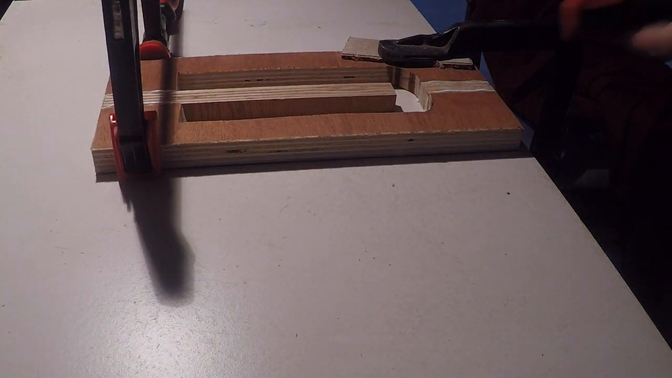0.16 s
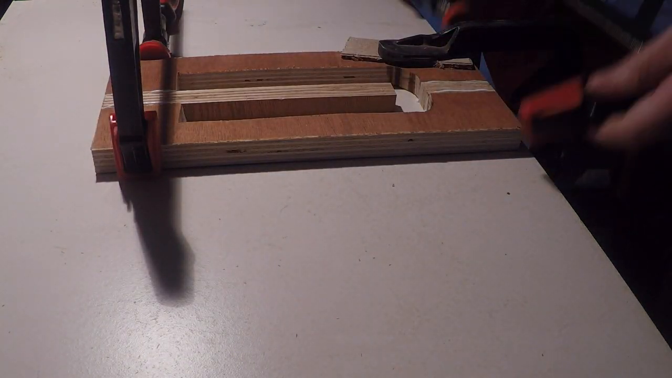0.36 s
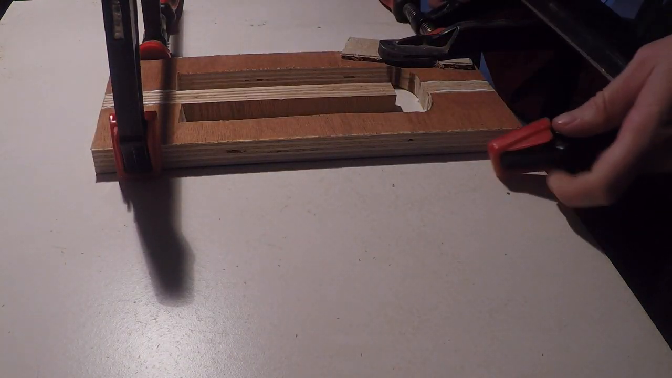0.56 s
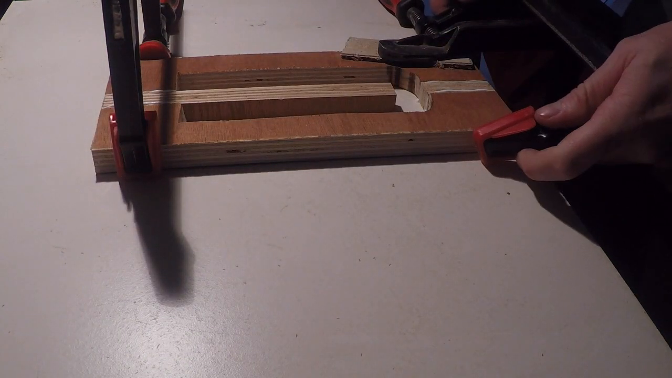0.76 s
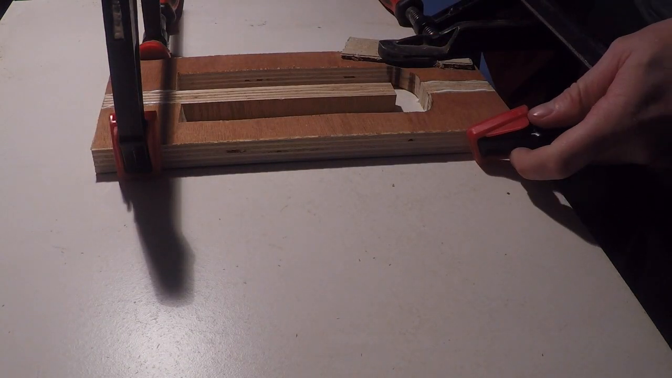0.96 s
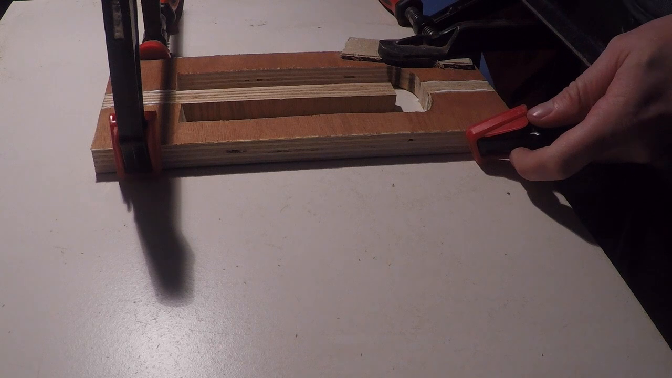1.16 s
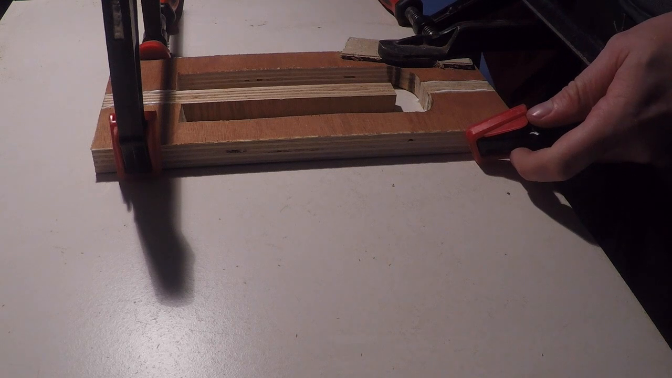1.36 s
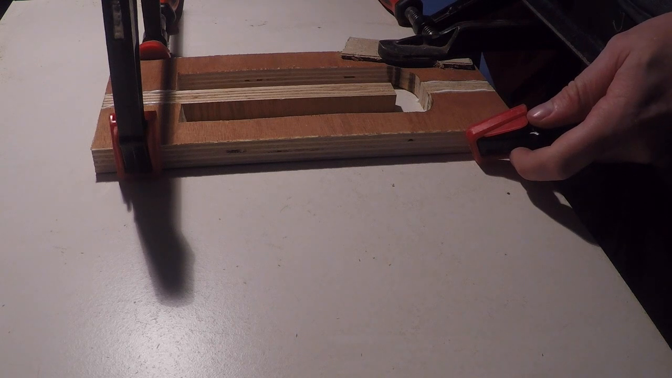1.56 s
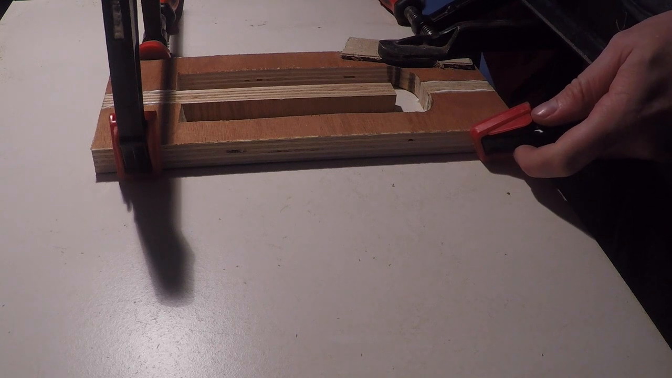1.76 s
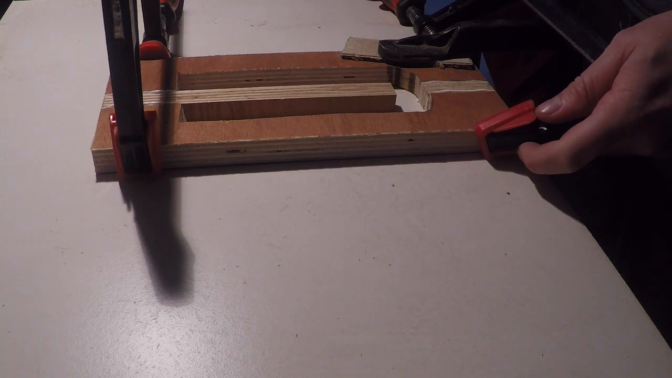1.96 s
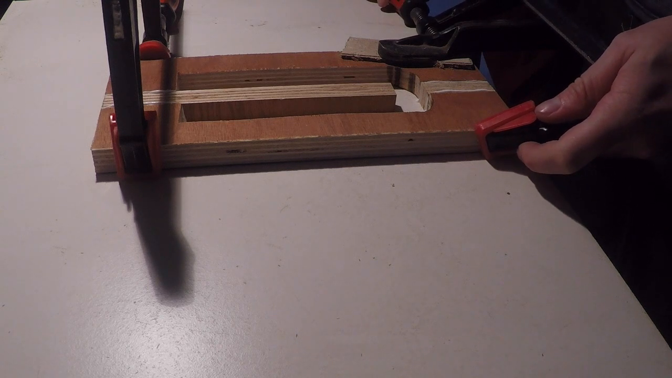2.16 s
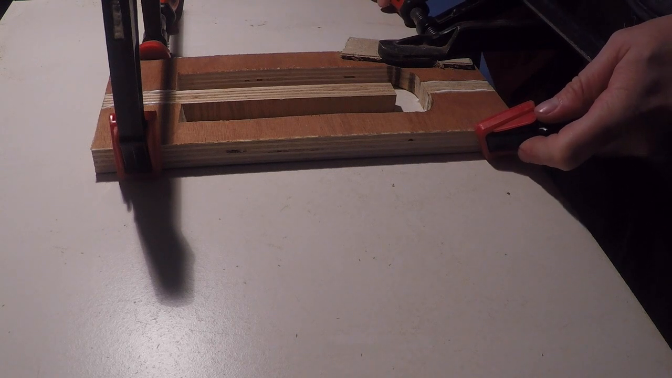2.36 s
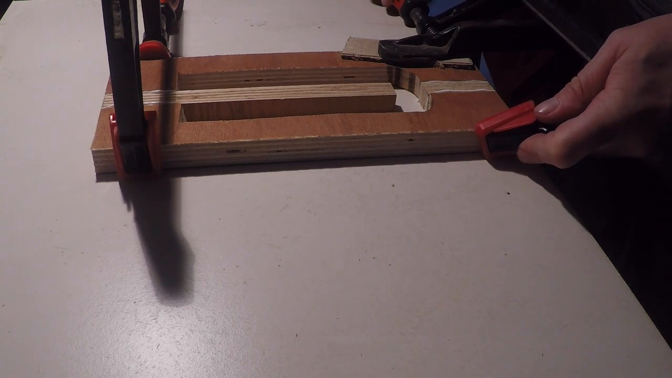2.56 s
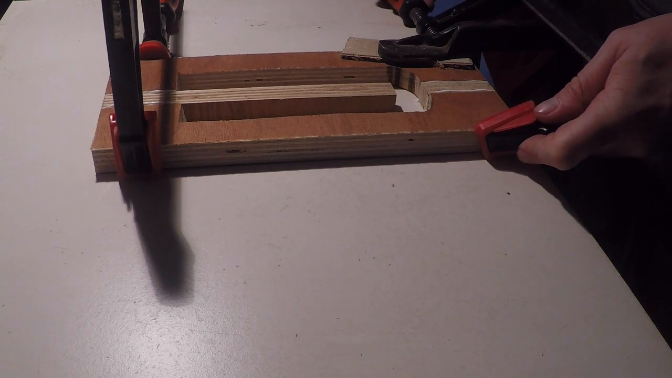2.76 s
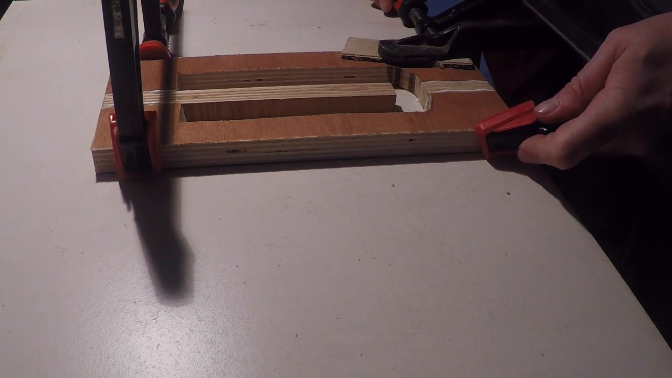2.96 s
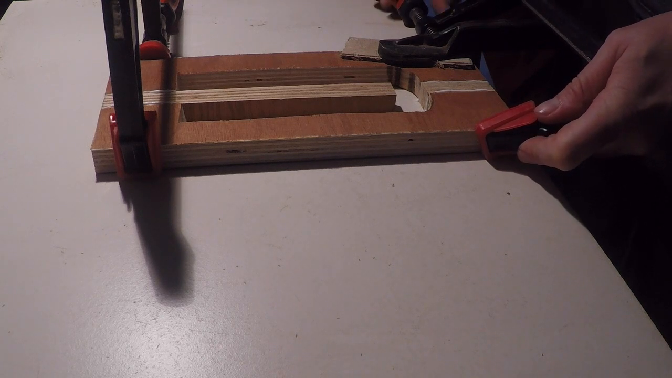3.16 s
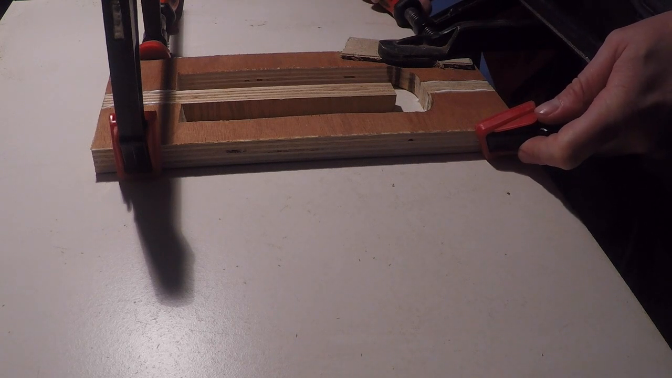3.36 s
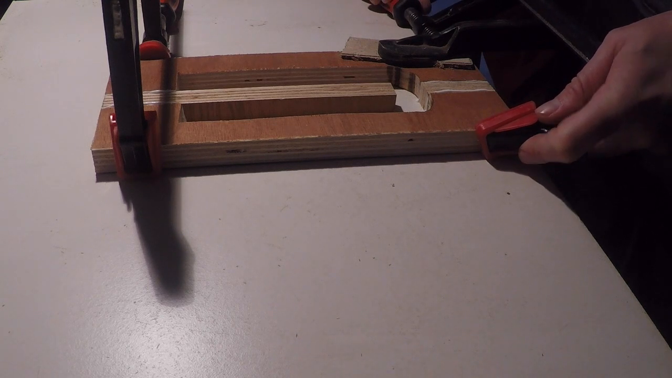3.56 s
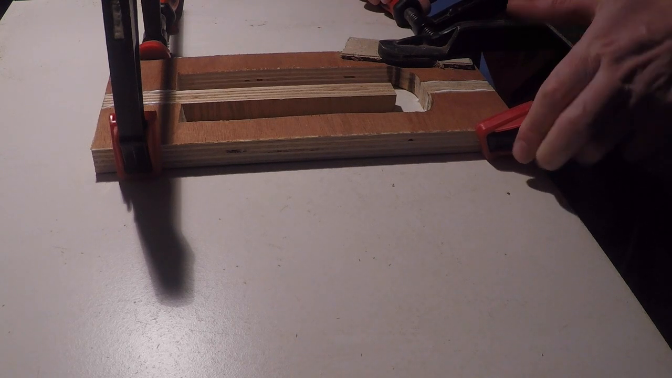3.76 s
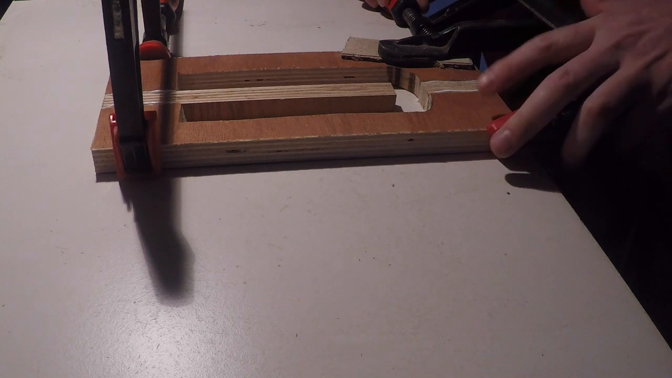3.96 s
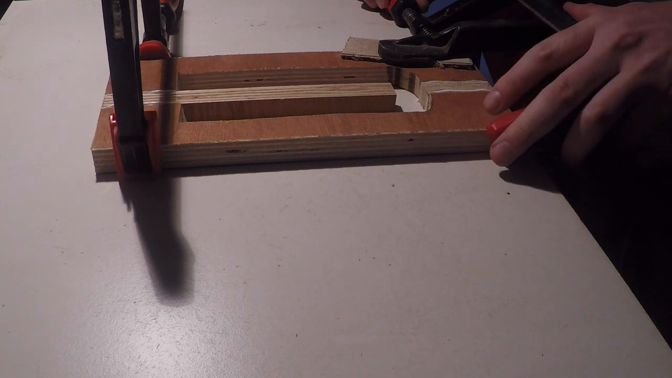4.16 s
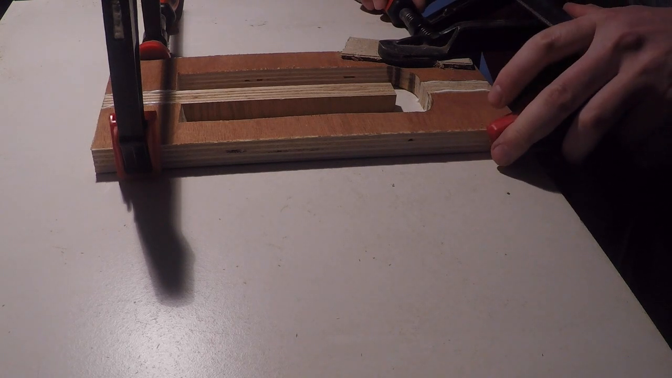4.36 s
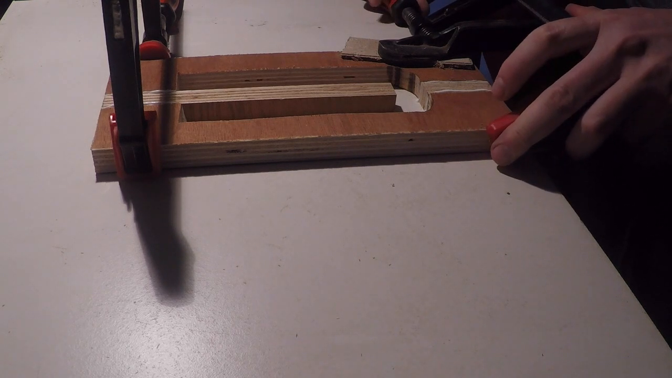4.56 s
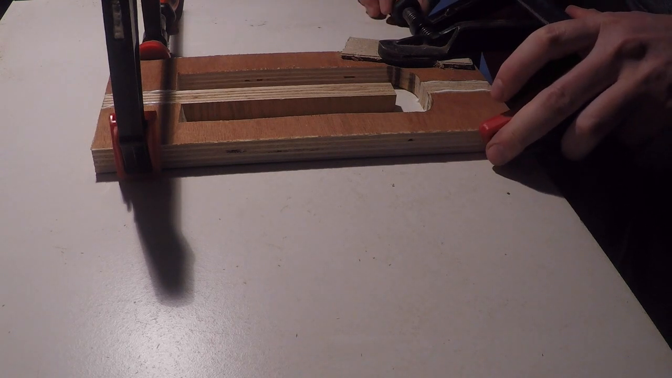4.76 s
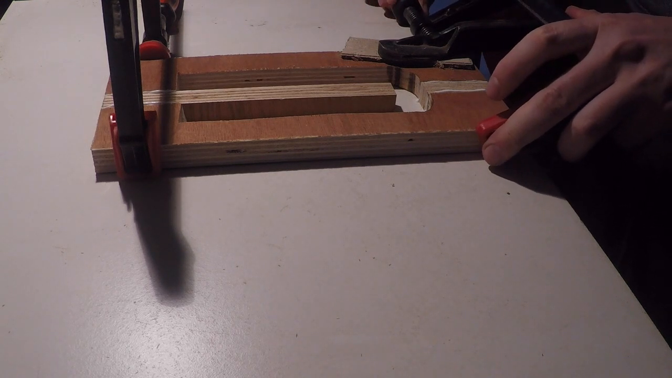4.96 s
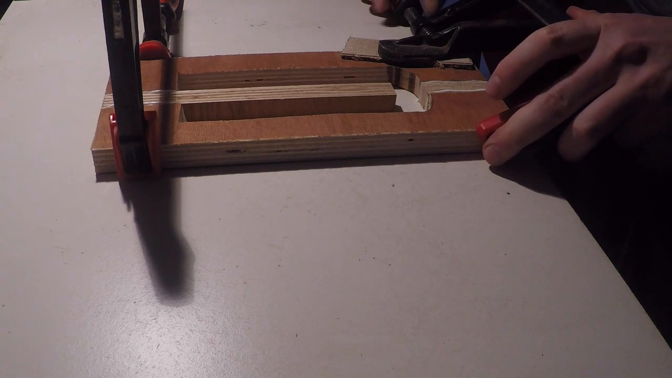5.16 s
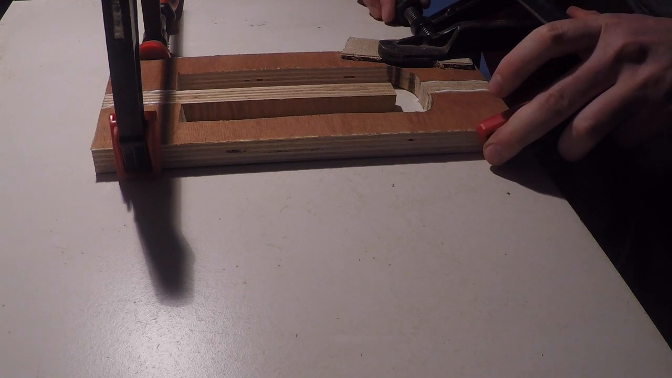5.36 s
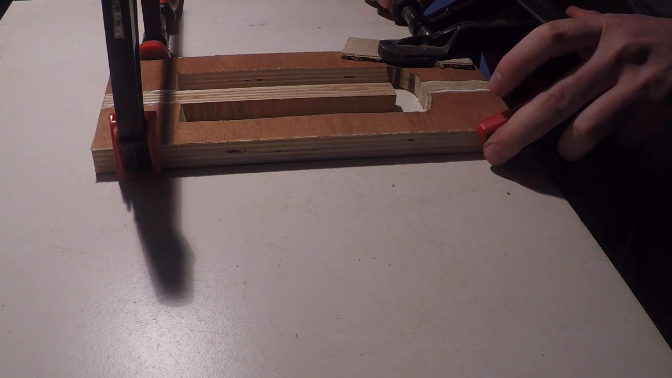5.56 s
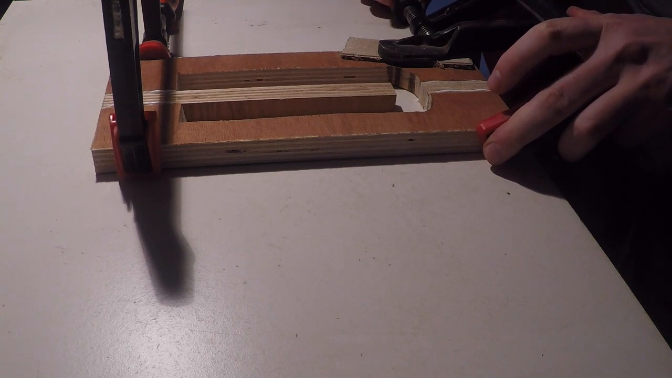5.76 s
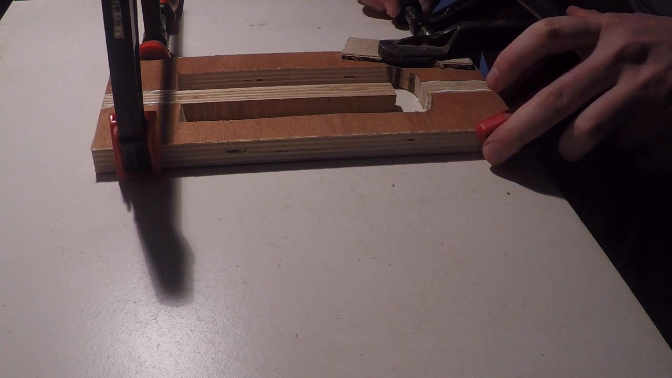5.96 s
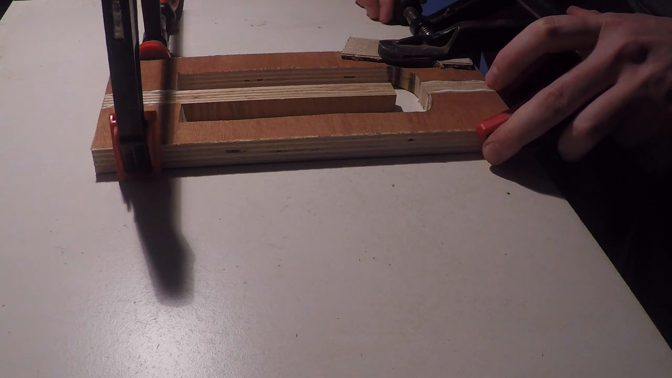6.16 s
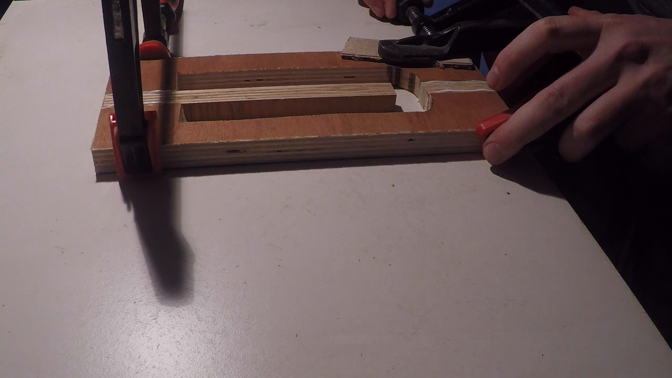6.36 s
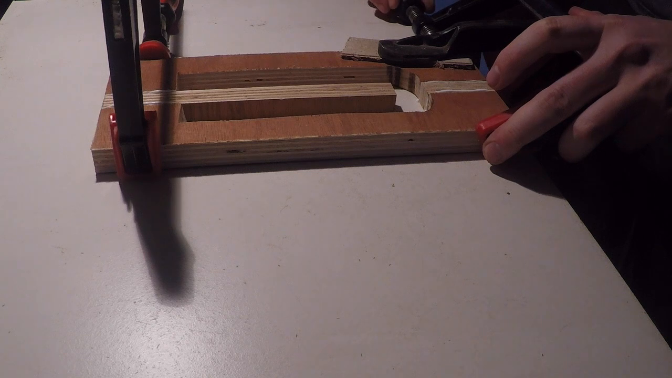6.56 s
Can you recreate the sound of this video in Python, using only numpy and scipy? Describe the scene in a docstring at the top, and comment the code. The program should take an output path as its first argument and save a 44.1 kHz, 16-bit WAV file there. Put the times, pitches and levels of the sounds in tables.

```python
"""A steel bar clamp is slid open, set on a plywood workpiece and tightened on a bench in a small workshop.
Its jaw scrapes and catches along the bar: tiny random slips make the steel ring, and at times squeak.
Blows on the wood mix a bench thud, a jaw crack and a ring of steel; the work also judders, shifts and creeps.
Once there is a light rub along the clamp. Hiss and a faint machine rumble in the building, both made of
filtered noise, run throughout with a low hum and a faint sounding of the bench."""
import sys
import numpy as np
from scipy import signal
from scipy.fft import rfft, irfft
from scipy.io import wavfile
from scipy.ndimage import uniform_filter1d

SR = 44100
rng = np.random.default_rng(int(sys.argv[2]) if len(sys.argv) > 2 else 0)


def pcm_store(signal):
    """Save signal as 16-bit PCM."""
    levels = np.round(np.clip(np.atleast_2d(signal), -1, 1) * 32767)
    wavfile.write(sys.argv[1], SR, levels.astype(np.int16).T)


N = 291060
TIME = np.arange(N) / SR  # seconds since the scene began
AGE = np.arange(24576) / SR  # seconds since one sound began


def amp(db):
    """Turns decibels into a gain."""
    return 10 ** (np.asarray(db) / 20)


def unit(x):
    """Scales a sound to an average strength (rms) of 1."""
    return x / np.sqrt(np.mean(x ** 2) + 1e-20)


def struck(x, size=882):
    """Scales a sound so that its first `size` samples (normally 20 ms) have rms 1."""
    return x / np.sqrt(np.mean(x[:size] ** 2) + 1e-20)


def add(mix, s, sound):
    """Mixes a sound in at time s."""
    start = max(round(s * SR), 0)
    part = mix[start:][:len(sound)]
    part += sound[:len(part)]


def colour(x, points):
    """Filters a sound by a curve of (frequency, level) points."""
    hz, db = np.transpose(points)
    bins_hz = np.fft.rfftfreq(len(x), 1 / SR)
    curve_db = np.interp(np.log(bins_hz + 1), np.log(hz), db)
    return irfft(rfft(x) * amp(curve_db), len(x))


def noise(points, size):
    """Makes coloured noise of rms 1."""
    return unit(colour(rng.standard_normal(size), points))


def fade(t60):
    """Dies away by 60 dB in t60 seconds."""
    return np.exp(-np.log(1000) * AGE / max(t60, 1e-3))


def rise(seconds):
    """Gives a soft start, quick at first and then levelling off."""
    return 1 - np.exp(-AGE / max(seconds, 1e-5))


def arch(seconds):
    """Swells and sinks again within the given time."""
    return np.sin(np.pi * np.minimum(AGE / seconds, 1))


def slips(per_s, size):
    """Makes tiny stick-slip impulses at random moments."""
    happens = rng.random(size) < per_s / SR
    return rng.standard_normal(size) * happens


def bending_wave(points, delay_s, ref_hz=500):
    """A pulse crosses the bench top: high notes travel faster, so it arrives as a falling chirp."""
    hz = np.fft.rfftfreq(len(AGE), 1 / SR)
    # delay_s is the travel time at ref_hz
    chirp = irfft(np.exp(-2j * 2 * np.pi * delay_s * np.sqrt(hz * ref_hz)), len(AGE))
    return colour(chirp, points) * fade(t60=0.16)


# ringing notes of bench top and workpiece: (frequency [Hz], relative level [dB], 60 dB fade time [s])
WOOD_MODES = [(106.6, -10, 0.21), (173.3, 0, 0.17), (200, -5.5, 0.13), (245.3, -5, 0.18), (325, 0, 0.14),
              (346, -9, 0.34), (383.5, 1.5, 0.16), (425.3, -5, 0.26), (493, -12, 0.1), (548, -6.5, 0.11),
              (580.6, -4.5, 0.11), (677, -13.5, 0.19), (729, -10, 0.15), (813, -45, 0.042),
              (920, -27.5, 0.27), (1002, -19, 0.12), (1128, -20.5, 0.16)]
# many short notes of the wood, too close to tell apart: (frequency [Hz], relative level [dB])
WOOD_GRAIN = [(60, -29), (150, 4.5), (230, -0.5), (400, 12.5), (650, -5), (900, -10.5), (1300, -14),
              (2200, -60)]
# the bending wave straight from the blow: (frequency [Hz], relative level [dB])
FIRST_WAVE = [(50, 9), (150, -0.5), (330, 1.5), (600, 1), (900, -5), (1400, -20), (2200, -23.5),
              (5000, -87)]


def wood(hardness_db, hinge_hz=380, neutral_db=-11, grain_db=-6, wave_db=-1.5, echo_db=-4):
    """The bench rings; a hard contact brings out its high notes, a soft one leaves only the low ones."""
    def tilt_db(hz):
        octaves = np.log2(max(hz / hinge_hz, .8))
        return (hardness_db - neutral_db) * octaves

    modes = np.zeros(len(AGE))
    for k, (hz, db, t60) in enumerate(WOOD_MODES):
        # neighbouring notes start in opposite directions, so the thud takes a few ms to build
        modes += (-1) ** k * amp(db + tilt_db(hz)) * fade(t60) * np.sin(2 * np.pi * hz * AGE)

    grain_shape = [(hz, db + tilt_db(hz)) for hz, db in WOOD_GRAIN]
    grain_fade = fade(t60=0.15) + amp(-15.5) * fade(t60=0.28)
    grain = noise(grain_shape, len(AGE)) * rise(0.0016) * grain_fade

    # the wave arrives once directly and once, duller, from the far edge
    direct_shape = [(hz, db + tilt_db(hz)) for hz, db in FIRST_WAVE]
    edge_shape = [(hz, db - 6 * max(np.log2(hz / hinge_hz), 0)) for hz, db in direct_shape]
    direct = bending_wave(direct_shape, delay_s=0.002212)
    edge = bending_wave(edge_shape, delay_s=0.008005)
    wave = direct + amp(echo_db) * edge
    return struck(struck(modes) + amp(grain_db) * struck(grain) + amp(wave_db) * struck(wave))


# the steady hiss: (frequency [Hz], relative level [dB])
AIR = [(53, -16), (90, 2), (102, 2), (190, -0.5), (216, -10), (241, -8), (280, -10), (370, -15.5),
       (411, -12.5), (448, -18.5), (579, -21), (1060, -14.5), (1150, -18), (4240, -20.5), (15000, -35)]
# the machine's rumble: (frequency [Hz], relative level [dB])
RUMBLE = [(8, -23), (20, -46), (33, -5), (46, 4), (56, -6.5), (75, -16), (100, -21.5), (170, -61.5)]
# a steady low hum: (frequency [Hz], level [dB])
HUM = [(26.9, -42.5)]


def workshop(air_db=-61, rumble_db=-43, bench_db=-65):
    """Hiss and rumble are filtered noise, the hum a pure tone; gentle noise keeps the bench sounding."""
    hum = np.zeros(N)
    for hz, db in HUM:
        # the root of 2 gives the tone its level as rms
        hum += amp(db) * np.sqrt(2) * np.sin(2 * np.pi * (hz * TIME + rng.random()))
    bench = unit(signal.fftconvolve(rng.standard_normal(N), wood(hardness_db=-13.5))[:N])
    return amp(air_db) * noise(AIR, N) + amp(rumble_db) * noise(RUMBLE, N) + hum + amp(bench_db) * bench


# the work shifts on the bench under the hand:
# (time [s], level before the overall trim [dB], hardness [dB], length [s])
NUDGES = [(0.0, -46.5, -11, 0.044), (0.051, -47.5, -8.5, 0.077), (0.581, -31.5, -19.5, 0.015),
          (0.658, -35, -18.5, 0.021), (0.704, -29, -21, 0.034), (1.991, -43.5, -20, 0.032),
          (2.064, -48, -4.5, 0.026), (2.838, -52, -8, 0.15), (3.088, -46, -11.5, 0.033),
          (3.291, -55.5, -10.5, 0.133), (3.893, -46, -10.5, 0.066), (4.103, -49.5, -6.5, 0.016),
          (4.252, -53.5, -12.5, 0.021), (4.807, -47, -14.5, 0.04), (4.916, -47, -16.5, 0.087),
          (5.49, -46.5, -12.5, 0.072), (6.22, -47.5, -20, 0.022), (6.488, -48.5, -15, 0.037)]


def nudges(trim_db=-1, slips_per_s=1200):
    """Each nudge is a swell of tiny slips, each slip thumping the bench."""
    out = np.zeros(N)
    for s, db, hardness, length in NUDGES:
        swell = slips(slips_per_s, len(AGE)) * arch(length)
        thump = signal.fftconvolve(swell, wood(hardness))[:len(AGE)]
        add(out, s, amp(db + trim_db) * struck(thump, size=round((length + .012) * SR)))
    return out


# ringing notes of the clamp's bar:
# (frequency [Hz], relative level before random variation [dB], 60 dB fade time [s])
BAR = [(719.2, -3.5, 0.55), (1771, -6.5, 0.14), (2400, -16, 0.3), (2717, 5.5, 0.11), (3570, -4, 0.23),
       (3800, -17, 0.5), (4100, 0, 0.24), (4484, -2.5, 0.32), (4550, 3, 0.22), (4610, -5, 0.75),
       (4830, -9.5, 0.22), (5440, -6, .35), (6770, -11, 0.19), (8550, -11.5, .15)]


def bar_modes():
    """The bar rings at its own notes; every call, like a new point of contact, mixes them differently."""
    out = np.zeros(len(AGE))
    for hz, db, t60 in BAR:
        strength = amp(db) * (.5 + rng.random())
        out += strength * fade(t60) * np.sin(2 * np.pi * (hz * AGE + rng.random()))
    return out


# the bar's dense ring, before any brightening: (frequency [Hz], relative level [dB])
STEEL = [(500, -6.5), (1000, -15.5), (1900, -9), (2800, -5.5), (3400, -4.5), (4600, -2.5), (5400, -6),
         (6200, -11.5), (7200, -15.5), (8600, -20), (10500, -36), (15000, -34)]


def steel(tail_db, lines_db, bright_db=0):
    """Short noise makes a bright tick, longer noise the clamp's dense ring, and the bar adds its own notes."""
    # brightness acts little by little from 4800 Hz, in full from 8000 Hz
    shape = [(hz, db + bright_db * np.interp(hz, [4800, 8000], [0, 1])) for hz, db in STEEL]
    tick_and_tail = fade(t60=0.036) + amp(tail_db) * fade(t60=0.65)
    dense = noise(shape, len(AGE)) * rise(0.00015) * tick_and_tail
    return struck(struck(dense) + amp(lines_db) * struck(bar_modes()))


# the jaw slides along the bar: (time [s], drive level of the scrape [dB])
SLIDE = [(0.05, -60), (0.126, -53.5), (0.134, -48), (0.174, -57), (0.18, -50.5), (0.32, -45),
         (0.328, -40.5), (0.42, -58)]
# the jaw snags on its bar: (time [s], level before the overall trim and soft start [dB], brightness [dB])
CATCHES = [(0.13, -38.5, -8), (0.2199, -36, 4), (0.2658, -35, -7), (0.3267, -32, 6.5), (0.36, -34, -5),
           (0.528, -32.5, -2), (0.6876, -40, 5), (3.87, -51, 11)]


def jaw(catch_trim_db=-8.5, scrape_db=-1.5, sing_db=-4, grains_per_s=220, contacts=4):
    """Slips at several points of contact grate along the bar and make it sing; now and then the jaw snags."""
    s, db = np.transpose(SLIDE)
    pressure = np.interp(TIME, s, amp(db), 0, 0)  # silent before and after the slide
    out = np.zeros(N)
    for _ in range(contacts):
        tick = steel(tail_db=-21, lines_db=-17)
        modes = bar_modes()
        # both parts are scaled to equal energy before they are mixed
        ring = amp(scrape_db) * tick / np.linalg.norm(tick) + amp(sing_db) * modes / np.linalg.norm(modes)
        grating = unit(slips(grains_per_s / contacts, N)) * pressure
        out += signal.oaconvolve(grating, ring)[:N] / np.sqrt(contacts)
    for s, db, bright in CATCHES:
        snag = rise(0.0017) * steel(tail_db=-20, lines_db=-5.5, bright_db=bright)
        add(out, s, amp(db + catch_trim_db) * snag)
    return out


# the steel squeaks under load: (time [s], pitch [Hz], level without the room [dB])
SQUEAKS = [(0.119, 5430, -58), (0.338, 4450, -46.5), (2.032, 4690, -59.5), (2.858, 2800, -69),
           (2.9, 4950, -67), (3.885, 4480, -67.5)]
SQUEAK_S, SQUEAK_WIDTH_HZ = 0.053, 300  # length of the drive; width of each of the two resonance stages


def squeaks(room_db=-9):
    """Brief stick-slip, made as noise, feeds one narrow resonance, which lingers in the room."""
    out = np.zeros(N)
    for s, hz, db in SQUEAKS:
        drive = rng.standard_normal(len(AGE)) * arch(SQUEAK_S)
        pole = np.exp((2j * hz - SQUEAK_WIDTH_HZ) * np.pi / SR)
        # using the pole twice makes two equal resonances in a row
        resonance = signal.lfilter([1], np.poly([pole, pole]), drive).real
        tone = struck(resonance, size=round(SQUEAK_S * SR))
        room = rng.standard_normal(len(AGE)) * fade(t60=.5)
        echo = signal.fftconvolve(tone, room / np.linalg.norm(room))[:len(AGE)]
        add(out, s, amp(db) * (tone + amp(room_db) * echo))
    return out


# the crack of jaw against wood: (frequency [Hz], relative level [dB])
CLACK = [(400, -32), (650, 10.5), (1000, 6.5), (1300, -12), (1500, 3), (2050, 5.5), (2400, -2.5),
         (2750, 4.5), (3400, -15.5), (4500, -5), (6500, -45), (12000, -65)]
# what the room keeps of that crack: (frequency [Hz], relative level [dB])
WASH = [(400, -9), (1200, -10), (1700, -8), (2050, 2), (2400, 0), (2850, 1.5), (3350, -3.5), (4000, -5),
        (4750, -9), (6000, -28), (12000, -46)]


def clack(wash_db):
    """The jaw cracks briefly against the wood, then the room holds a wash of it; both are fading noise."""
    crack = noise(CLACK, len(AGE)) * rise(0.00038) * fade(t60=0.061)
    wash = noise(WASH, len(AGE)) * rise(0.0013) * fade(t60=0.42)
    return struck(crack) + amp(wash_db) * struck(wash)


# blows of the clamp on the work: (time [s], thud level [dB], hardness [dB], clack level [dB],
# room wash relative to the clack [dB], steel ring level [dB], steel brightness [dB])
KNOCKS = [(0.429, -23, -8, -36.5, -10, -36.5, 1), (0.535, -20, -12, -38.5, -21, -41.5, -12),
          (0.543, -19.5, -14.5, -38.5, -26, -44, -5), (0.574, -26, -13, -50.5, -20, -66, -8),
          (0.7418, -31, -7.5, -37.5, -1.5, -41, 2), (0.758, -28.5, -13, -55, -26, -52, 5),
          (2.042, -42.5, -12, -60, -17, -55, -3), (2.066, -40, -25, -54.5, -11, -63, -9),
          (2.915, -35, -13, -70, 2, -59.5, -5), (3.752, -41.5, -28, -62.5, -22, -64.5, 2),
          (3.966, -38.5, -15.5, -78, -17, -72, 0), (5.1746, -32.5, -7.5, -48.5, -14, -61, 5),
          (5.53, -26, -8, -29.5, -12, -41.5, -16), (5.5333, -31.5, -11, -36, -11, -49, -11),
          (5.565, -33.5, -16.5, -62, -7, -49.5, -1)]


def knocks():
    """Each blow sounds the bench, the jaw and the bar together."""
    out = np.zeros(N)
    for s, thud_db, hardness, crack_db, wash_db, ring_db, bright in KNOCKS:
        add(out, s, amp(thud_db) * wood(hardness))
        add(out, s, amp(crack_db) * clack(wash_db))
        add(out, s, amp(ring_db) * steel(tail_db=-14.0, lines_db=-14.5, bright_db=bright))
    return out


# the workpiece judders on the bench when it is pressed home:
# (time [s], pitch [Hz], level of the bounces [dB])
JUDDERS = [(0.538, 328, -10.5), (0.702, 226.5, -28.5), (0.753, 380, -20.5), (2.923, 265, -33.5),
           (3.97, 339, -37), (5.547, 398, -25.5)]


def judders(under_db=-9, bench_db=-18, length_s=0.021):
    """A few quick bounces, alternately strong and weak, set the bench ringing."""
    out = np.zeros(N)
    for s, hz, db in JUDDERS:
        turns = hz * AGE
        # a tone at half the pitch makes every other bounce weaker
        half_pitch = amp(under_db) * np.sin(np.pi * turns)
        bounce = (np.sin(2 * np.pi * turns) + half_pitch) * arch(length_s)
        ringing = signal.fftconvolve(bounce, wood(hardness_db=-8))[:len(AGE)]
        add(out, s, amp(db) * (bounce + amp(bench_db) * ringing / np.abs(ringing).max()))
    return out


# the soft noise of the rub: (frequency [Hz], relative level [dB])
BRUSH_COLOUR = [(150, -46), (250, -24), (364, 0), (531, -1.5), (788, -12), (873, -9), (1620, -15.5),
                (3210, -13), (3880, -10.5), (7060, -25.5), (15000, -38)]
BRUSH_S, BRUSH_DB = 1.372, -52  # start time; level of the rub at its fullest
BRUSH_ATTACK_S, BRUSH_HOLD_S, BRUSH_FALL_DB_PER_S = 0.034, 0.053, 81


def brush(rough_db=1.0, rasp_db=-6, rasp_s=.07):
    """One light, uneven rub of noise rasps on the steel as it starts, then holds and dies away."""
    falling_s = np.maximum(AGE - BRUSH_ATTACK_S - BRUSH_HOLD_S, 0)
    envelope = np.minimum(AGE / BRUSH_ATTACK_S, 1) * amp(-BRUSH_FALL_DB_PER_S * falling_s)
    wander = unit(uniform_filter1d(rng.standard_normal(len(AGE)), size=300))
    rub = unit(noise(BRUSH_COLOUR, len(AGE)) * amp(rough_db * wander)) * envelope
    scratch = slips(per_s=900, size=len(AGE)) * arch(rasp_s)
    rasp = signal.fftconvolve(scratch, bar_modes())[:len(AGE)]
    out = np.zeros(N)
    add(out, BRUSH_S, amp(BRUSH_DB) * (rub + amp(rasp_db) * struck(rasp, size=round(rasp_s * SR))))
    return out


def creep(start_s=2.6, level_db=-66, slips_per_s=150, uneven_db=3):
    """While the screw is tightened the work creeps in faint slips, as the grip comes and goes."""
    wander = unit(uniform_filter1d(rng.standard_normal(N), size=5000))
    grip = amp(uneven_db * wander) * (TIME > start_s)
    creaks = signal.fftconvolve(slips(slips_per_s, N) * grip, wood(hardness_db=-20))[:N]
    return amp(level_db) * unit(creaks)


def scene():
    """All sources add up at one microphone."""
    mix = workshop() + nudges() + jaw() + squeaks() + knocks() + judders() + brush() + creep()
    return mix[None]


def record(dry, edge_hz=15200):
    """The recorder's band limit: a steep filter removes what lies above edge_hz."""
    lowpass = signal.firwin(1023, edge_hz, window=("kaiser", 9), fs=SR)
    return signal.oaconvolve(dry, lowpass[None], "same")


dry = scene()
out = record(dry)
pcm_store(out)
```